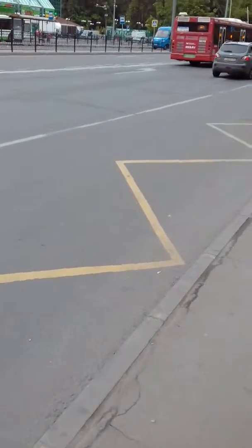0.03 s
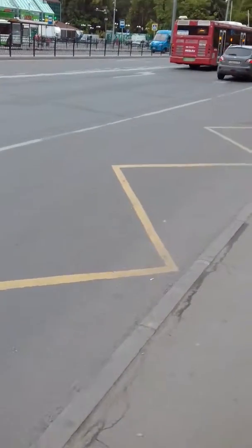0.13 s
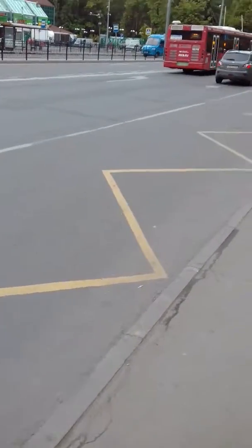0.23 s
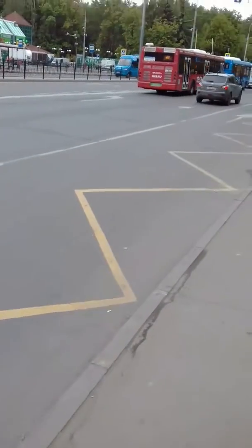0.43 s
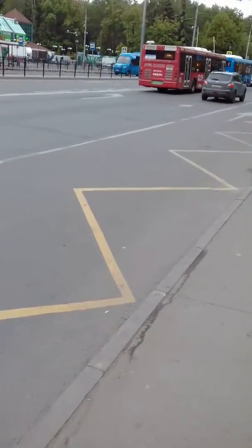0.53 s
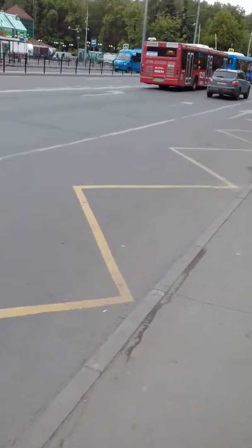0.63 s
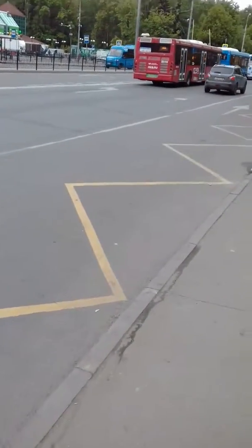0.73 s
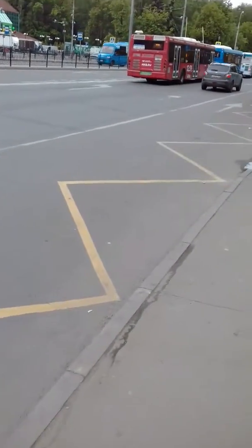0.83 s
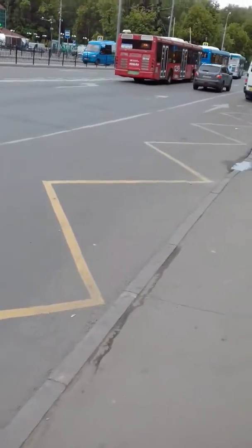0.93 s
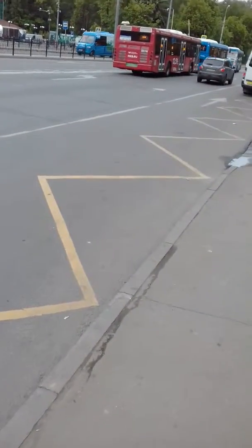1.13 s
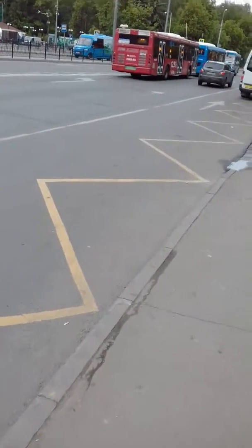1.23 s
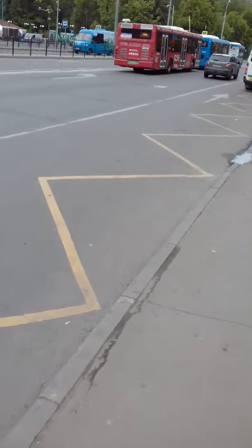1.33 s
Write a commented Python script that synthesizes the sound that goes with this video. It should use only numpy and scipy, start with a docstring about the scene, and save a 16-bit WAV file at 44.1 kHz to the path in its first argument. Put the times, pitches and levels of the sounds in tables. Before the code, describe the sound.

A vehicle's brake squeals, thin and high, catching briefly and then holding one note before letting go. A fainter, rougher squeal wavers above it, while engines and tyres slowly grow louder on a wide city street.

```python
"""Brake squeal on a city street

Engines and tyres roar on a wide street, slowly growing. A vehicle brakes, and friction makes one brake
sing a thin, pure squeal near 5 kHz that catches, holds and lets go. At its loudest it chatters briefly,
then slips into period doubling. A fainter, rougher squeal wanders above it, and the street returns
a weak echo of both."""
import sys
import numpy as np
from scipy import signal
from scipy.fft import rfft, irfft, next_fast_len
from scipy.io import wavfile
from scipy.ndimage import uniform_filter1d, map_coordinates

SR = 44100
rng = np.random.default_rng(int(sys.argv[2]) if len(sys.argv) > 2 else 0)


def bounce(signal):
    """Save signal as a 16-bit WAV file at the path given by the first command-line argument."""
    frames = np.transpose(np.atleast_2d(signal))
    limited = np.clip(frames, -1, 1)
    pcm = np.round(limited * 32767).astype(np.int16)
    wavfile.write(sys.argv[1], SR, pcm)


N = 61739


def amp(db):
    """Decibels to gain."""
    return 10 ** (np.asarray(db) / 20)


def unit(x):
    """Scale to rms 1."""
    return x / np.sqrt(np.mean(x ** 2) + 1e-20)


def clock():
    """The time of every sample, in seconds."""
    return np.arange(N) / SR


def along(points, hz):
    """Read (freq_hz, value) points on a log frequency axis."""
    freqs, values = np.transpose(points)
    return np.interp(np.log(hz + 1), np.log(freqs + 1), values)


def curve(rows):
    """Join (time_s, value) points with straight lines."""
    return np.interp(clock(), *np.transpose(rows))


def gate(start_s, end_s, fade_s=.02):
    """Open between two times, with soft edges."""
    inside = np.minimum(clock() - start_s, end_s - clock())
    return np.sin(np.pi / 2 * np.clip(inside / fade_s + .5, 0, 1)) ** 2


def swell(rows):
    """Gain envelope through (time_s, level_db) points, silent outside them."""
    return amp(curve(rows)) * gate(rows[0][0], rows[-1][0])


def wobble(rate_hz):
    """Smooth random modulation, rate_hz knots a second."""
    return map_coordinates(rng.standard_normal(4096), [clock() * rate_hz], mode="wrap")


def phase_of(hz):
    """Running phase of a moving pitch, from a random start."""
    return 2 * np.pi * (np.cumsum(hz) / SR + rng.random())


def tone(phase):
    """A sine of rms 1."""
    return np.sqrt(2) * np.sin(phase)


def filtered(x, response):
    """Equalise x with a gain given as a function of frequency."""
    size = next_fast_len(N + SR // 2)
    return irfft(rfft(x, size) * response(np.fft.rfftfreq(size, 1 / SR)), size)[:N]


def rush(spectrum, patchy_db):
    """Coloured noise of rms 1, with random patches of gain across time and frequency."""
    bins = signal.stft(rng.standard_normal(N), nperseg=512)[2]
    patches = uniform_filter1d(rng.standard_normal(bins.shape), size=5, axis=0)
    patches = uniform_filter1d(patches, size=12, axis=1)
    noise = signal.istft(bins * amp(patchy_db * unit(patches)), nperseg=512)[1][:N]
    return unit(filtered(noise, lambda hz: amp(along(spectrum, hz))))


# Colour of the engine rumble: freq_hz, gain_db
RUMBLE_EQ = [(25, -30), (45, -30), (70, -1.5), (110, -7.5), (155, -1.5), (240, 1.5), (310, 0.5),
             (450, -2.5), (700, -8), (1300, -32)]
# Drone notes, relative to the rumble: pitch_hz, level_db
DRONE_NOTES = [(75, -21.5), (156, -11), (237, -12.5)]
# Fader for rumble and drone together: time_s, level_db
ENGINE_FADER = [(0.0, -43.5), (0.7, -44), (0.916, -41.5), (1.39, -40)]


def engines():
    """Traffic engines: a low rumble under a drone that wavers in pitch and level."""
    drone = 0
    for hz, db in DRONE_NOTES:
        gain = amp(db + 2.9 * wobble(9.4))
        pitch = hz * (1 + .0141 * wobble(11.86))
        drone += gain * tone(phase_of(pitch))
    return amp(curve(ENGINE_FADER)) * (rush(RUMBLE_EQ, patchy_db=0) + drone)


# Colour of the tyre roar: freq_hz, gain_db
TYRE_EQ = [(300, -22), (500, -10), (700, -7.5), (1000, 0.5), (1300, -2), (1750, -3), (2050, -10.5),
           (2450, -15), (3200, -19.5), (4400, -23), (9000, -45)]
# Its slow build: time_s, level_db
TYRE_FADER = [(0, -39), (.3, -37.5), (.62, -36.5), (.8, -33.5), (1.1, -34), (1.39, -34)]


def tyres():
    """Tyres roar on the road, growing as they draw nearer."""
    return amp(curve(TYRE_FADER)) * rush(TYRE_EQ, patchy_db=.66)


# Colour of the hiss, brightest near 10 kHz: freq_hz, gain_db
HISS_EQ = [(2650, -15.5), (4500, -11.5), (5180, -7), (5620, -8.5), (6400, -6), (6920, -9.5), (10100, 1.5),
           (11400, -7), (12900, -11.5), (13300, -13), (15500, -17)]
# Its fader, ahead of the boost: time_s, level_db
HISS_FADER = [(0.0, -44.5), (0.634, -43.5), (0.7, -44), (0.724, -44.5), (1.142, -46), (1.39, -46)]


def hiss(boost_db=8.5):
    """A high, nearly steady hiss on top of the traffic."""
    return amp(curve(HISS_FADER) + boost_db) * rush(HISS_EQ, patchy_db=.76)


# Colour of the distant wash: freq_hz, gain_db
FAR_EQ = [(200, -16.5), (600, -4.5), (1100, -0.5), (1700, -4), (2300, -7.5), (3200, -4.5), (4400, -8),
          (6000, -20), (9000, -37)]
# Its fader: time_s, level_db
FAR_FADER = [(0, -39), (.6, -38), (1.39, -42.5)]


def far_traffic():
    """Distant traffic blurs into a midrange wash that holds, then eases off."""
    return amp(curve(FAR_FADER)) * rush(FAR_EQ, patchy_db=1.5)


# Path of the upper squeal: time_s, pitch_hz
WANDER_PITCH = [(0, 6300), (.03, 6380), (.25, 6970), (.275, 6960), (.30, 5950), (.318, 6300), (.34, 6820),
                (.36, 6750), (.41, 6880), (.47, 6690), (.505, 6750), (.6, 6520), (.665, 6340), (.70, 6480),
                (.85, 6770), (.96, 6800), (1.03, 7000)]
# Its catches, each a bell-shaped swell: centre_s, length_s, peak_db
WANDER_CATCHES = [(0.018, 0.032, -40), (0.25, .02, -41.5), (0.31, 0.038, -45), (0.361, 0.027, -34.5),
                  (.408, .04, -34.5), (0.46, .03, -35), (.502, 0.047, -40), (.575, 0.091, -42.5),
                  (0.675, .022, -39), (0.717, 0.049, -36), (0.85, 0.034, -52), (0.959, 0.048, -38.5)]


def wandering_squeal(jitter_hz=36, shimmer_db=3.5, hold_db=-50, octave_db=-16):
    """A less stable mode of the brake catches in short, rough swells and drifts in pitch."""
    phase = phase_of(curve(WANDER_PITCH) + jitter_hz * wobble(290))
    catches = sum(amp(db) * np.exp(-(2 * (clock() - centre) / length) ** 2)
                  for centre, length, db in WANDER_CATCHES)
    hold = amp(hold_db) * gate(start_s=.33, end_s=1.04)
    shimmer = amp(shimmer_db * wobble(150))
    return (catches + hold) * shimmer * (tone(phase) + amp(octave_db) * tone(2 * phase))


def friction_noise(pitch, level_db=-28, offset_hz=70, width_hz=190):
    """Friction leaves a narrow skirt of noise around the squeal's pitch."""
    centre = phase_of(pitch + offset_hz)
    return amp(level_db) * (wobble(width_hz) * np.sin(centre) + wobble(width_hz) * np.cos(centre))


# The main squeal's nearly steady note: time_s, pitch_hz
SQUEAL_PITCH = [(.21, 4971), (.30, 4984), (.385, 4988), (.44, 4962), (.48, 4973), (.635, 4974), (.70, 4956),
                (.80, 4959), (.99, 4971)]
# How it catches, holds and lets go: time_s, level_db
SQUEAL_FADER = [(.16, -56), (.205, -35), (.275, -25.5), (.335, -52), (.38, -32), (.405, -26), (.44, -36),
                (.455, -27), (.525, -17), (.555, -26.5), (.595, -16.5), (.635, -18.5), (.68, -15),
                (.77, -18), (.81, -18.5), (.89, -17), (.935, -20), (.975, -16), (1.005, -34.5),
                (1.06, -62.5)]
# Its octave, on a separate fader: time_s, level_db
OCTAVE_FADER = [(0.38, -48), (0.486, -29), (0.512, -37), (0.604, -32.5), (0.65, -31), (0.708, -27.5),
                (0.756, -32.5), (0.866, -33.5), (0.894, -28.5), (0.932, -26), (0.994, -35.5), (1.01, -58)]
# Partials relative to the note; half multiples are period doubling: multiple, start_s, end_s, level_db
SQUEAL_PARTIALS = [(3, .44, 1, -35), (3, 0.75, 0.8, -26), (1.5, 0.787, 0.96, -21), (2.5, 0.76, .968, -37)]


def main_squeal(jitter_hz=3.3, shimmer_db=.83, octave_shimmer_db=2.58):
    """Friction drives one mode of the brake: a pure tone with overtones, noise and a moment of chatter."""
    pitch = curve(SQUEAL_PITCH) + jitter_hz * wobble(100)
    phase = phase_of(pitch)
    envelope = swell(SQUEAL_FADER) * amp(shimmer_db * wobble(73))
    partials = sum(amp(db + 1.9 * wobble(55)) * gate(start, end) * tone(multiple * phase)
                   for multiple, start, end, db in SQUEAL_PARTIALS)
    octave = swell(OCTAVE_FADER) * amp(octave_shimmer_db * wobble(90)) * tone(2 * phase)
    return envelope * (tone(phase) + partials + friction_noise(pitch)) + octave + chatter(phase)


# Sidebands around the squeal's harmonics: harmonic, offset_in_chatter_rates, level_db
CHATTER_SIDEBANDS = [(1, -1, -52), (1, 1, -46), (2, -1, -38), (2, 1, -43), (2, 2, -38), (2, 3, -41),
                     (3, -1, -53), (3, 1, -48), (3, 2, -55)]


def chatter(squeal_phase, rate_hz=283, jitter_hz=3.3, flicker_db=4.5):
    """The brake chatters for an instant, throwing flickering sidebands around the squeal."""
    flutter = phase_of(rate_hz + jitter_hz * wobble(180))
    sidebands = 0
    for harmonic, step, db in CHATTER_SIDEBANDS:
        gain = amp(db + flicker_db * wobble(80))
        loose_phase = 2 * np.pi * rng.random() + .5 * wobble(120)
        sidebands += gain * tone(harmonic * squeal_phase + step * flutter + loose_phase)
    return gate(start_s=.69, end_s=.724) * sidebands


# Decay time of the street: freq_hz, t60_s
STREET_DECAY = [(200, .5), (5000, 0.34), (15000, .2)]


def street_echo(x, level_db=-30, predelay_s=.036):
    """A diffuse echo from across the street; its treble dies first."""
    hz, t, bins = signal.stft(rng.standard_normal(SR // 2), SR, nperseg=256)
    decay = amp(-60 * t / along(STREET_DECAY, hz)[:, None])
    tail = signal.istft(bins * decay, SR, nperseg=256)[1]
    delayed = np.pad(x, (int(predelay_s * SR), 0))
    return amp(level_db) * signal.fftconvolve(delayed, tail / np.linalg.norm(tail))[:N]


def scene():
    """Both squeals and their echo over the traffic bed, in mono."""
    brake = main_squeal() + wandering_squeal()
    echo = street_echo(brake)
    traffic = engines() + tyres() + hiss() + far_traffic()
    return (brake + echo + traffic)[None]


def record(dry):
    """A brick-wall high cut on the whole mix."""
    return filtered(dry[0], lambda hz: hz < 15700)[None]


dry = scene()
out = record(dry)
bounce(out)
```